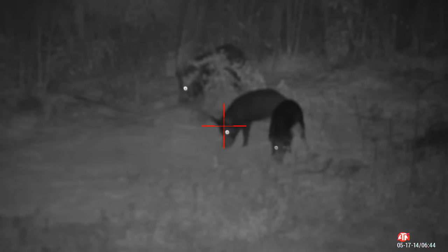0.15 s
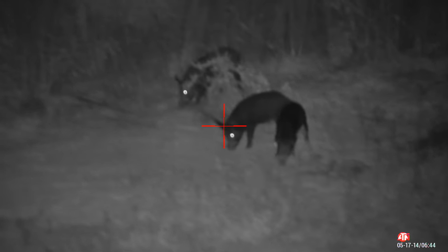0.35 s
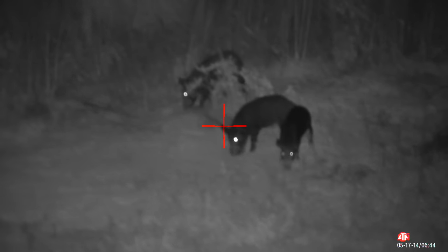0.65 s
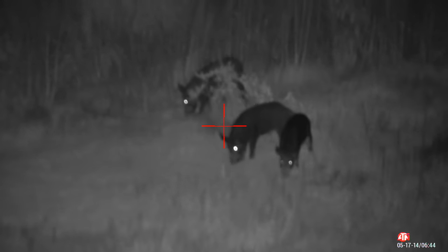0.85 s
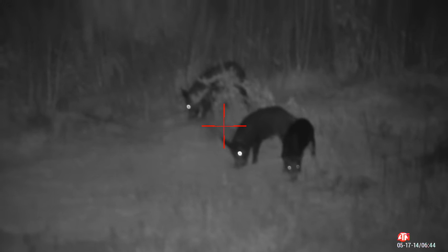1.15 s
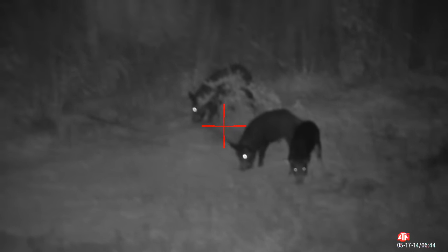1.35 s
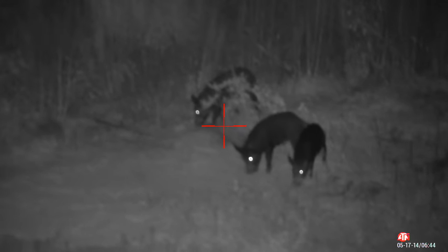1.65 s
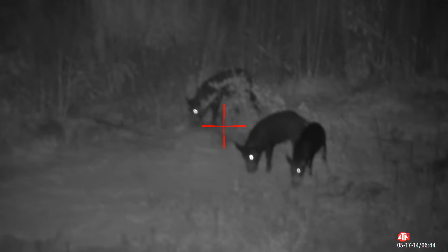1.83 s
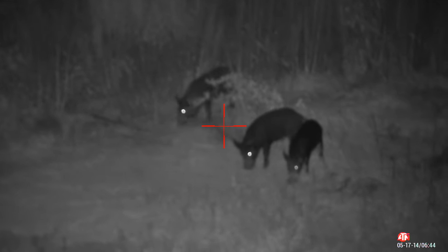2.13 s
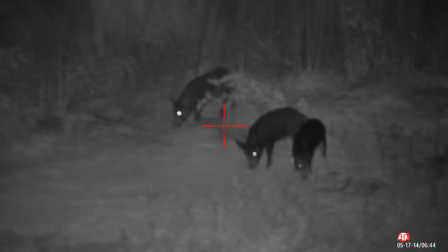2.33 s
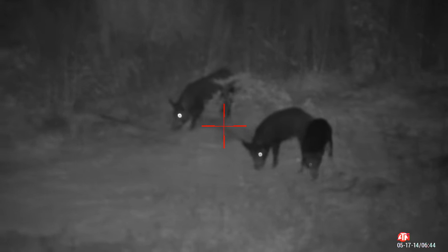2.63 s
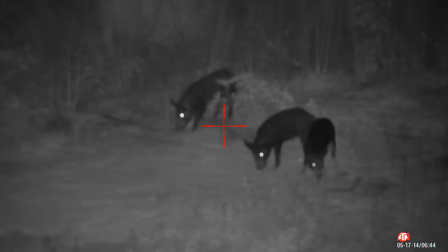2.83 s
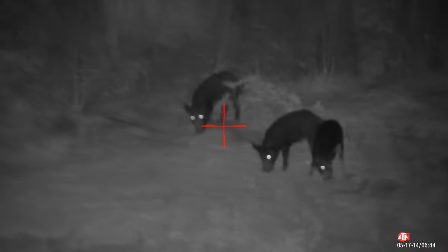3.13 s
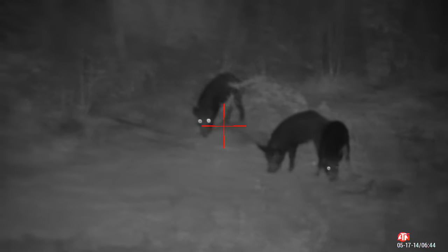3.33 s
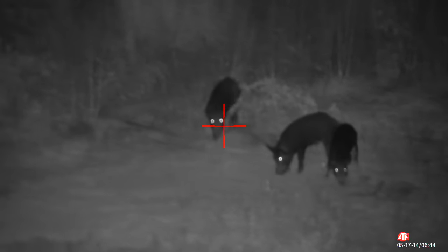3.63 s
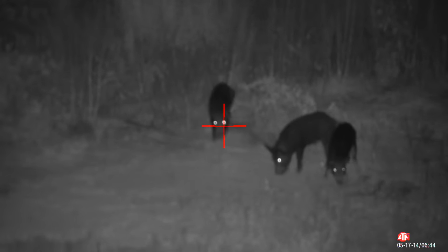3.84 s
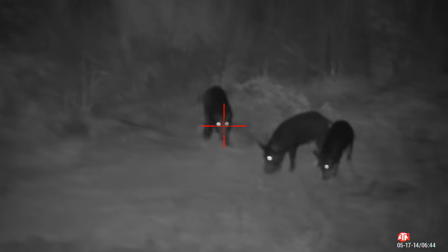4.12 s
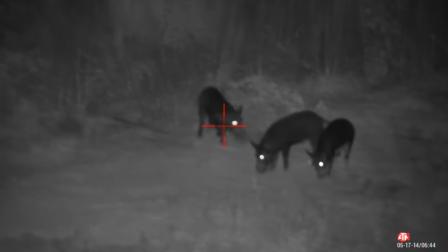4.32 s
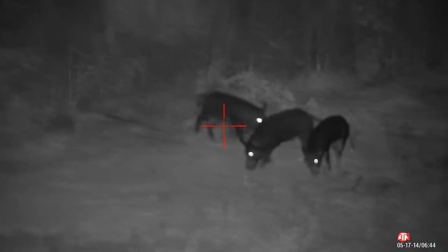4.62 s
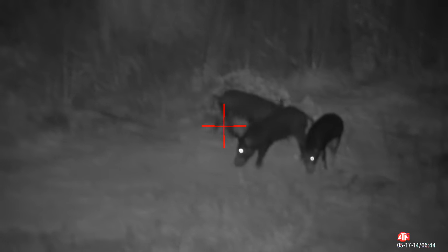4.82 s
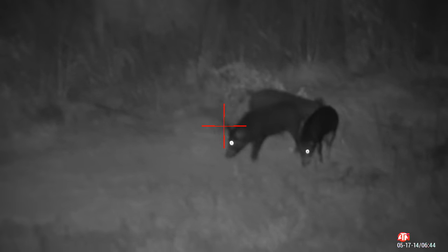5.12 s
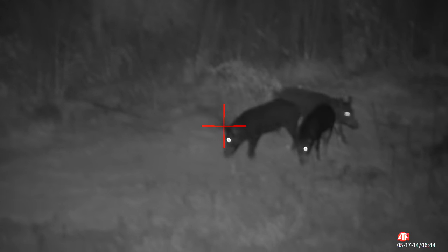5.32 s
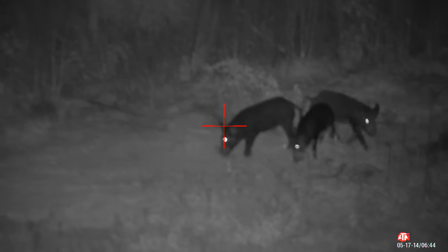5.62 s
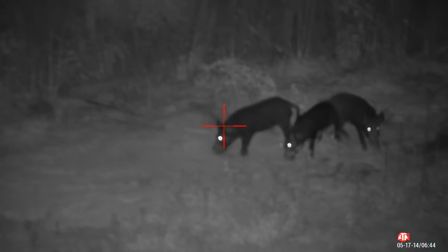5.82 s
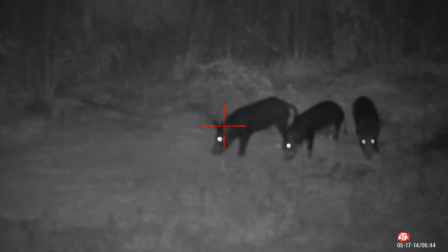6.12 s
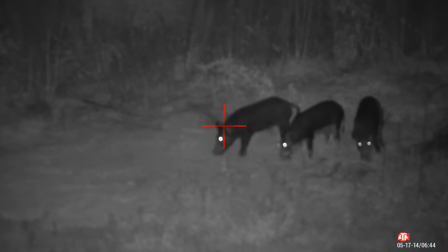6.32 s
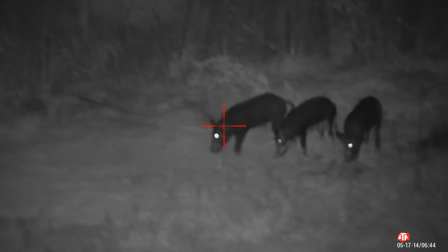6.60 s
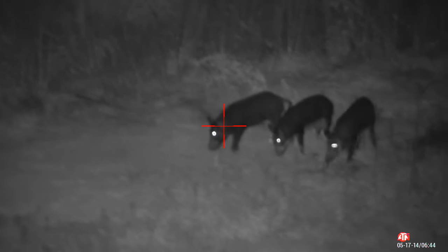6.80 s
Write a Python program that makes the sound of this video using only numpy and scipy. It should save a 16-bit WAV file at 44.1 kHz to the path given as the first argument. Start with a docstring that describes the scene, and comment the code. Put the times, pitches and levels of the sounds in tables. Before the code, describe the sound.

A dense, high-pitched cricket chorus fills a forest clearing at night for the whole seven seconds. Distant singers blur into a steady shrill wash, while nearer ones add fast trills, a quick rattle and chirps pulsing about three times a second. One unbroken trill leads, swelling briefly near 0.2, 2.1, 4.5 and 5.7 seconds. The rattling cricket rests from about 4.5 to 5.5 seconds, and a faint lower trill eases in and out.

Far off, wild pigs forage very quietly, with barely audible grass rustling and soft bumps. There is a faint knock near 1 second, and small twig snaps come at about 3.5, 4.1 and 5.4 seconds. Close to the single microphone, a faint low electronic buzz, a thin whine and a soft hiss continue underneath. The crickets dominate to the end.

```python
"""A forest clearing at night, heard through the single microphone of a night-vision scope.
Crickets sing all around, each wing stroke a short falling tone. The trees smear the far ones into
bands; a few nearer singers stand out, led by one unbroken trill. Far off, wild pigs forage with faint
snaps and bumps. Right at the microphone lie the scope's frame-rate buzz, a thin whine and hiss."""
import sys
import numpy as np
from scipy import signal
from scipy.fft import rfft, irfft, next_fast_len
from scipy.io import wavfile
from scipy.ndimage import uniform_filter1d

SR = 44100
rng = np.random.default_rng(int(sys.argv[2]) if len(sys.argv) > 2 else 0)


def digitize_waveform(pressure):
    """Quantize a signal to 16-bit integers and store it at the path in sys.argv[1].

    Rows of a 2-D input are taken as channels; values are limited to [-1, 1].
    """
    field = np.atleast_2d(pressure).T
    bounded = np.clip(field, -1, 1)
    quanta = np.round(bounded * 32767).astype(np.int16)
    wavfile.write(sys.argv[1], SR, quanta)


N = 306936


def undb(db):
    """Decibels to gain."""
    return 10 ** (np.asarray(db) / 20)


def level(x, db):
    """Scale a sound to an rms level."""
    return x * undb(db) / np.sqrt(np.mean(x ** 2))


def clock():
    """Time of every sample in seconds."""
    return np.arange(N) / SR


def walk(rate):
    """Slow chance: `rate` random values a second joined by lines, spread near 1."""
    steps = rng.standard_normal(1024)
    return np.interp(clock() * rate, np.arange(len(steps)), steps)


def beat(rate, crest_s, sharpness):
    """A smooth gain that crests `rate` times a second."""
    return np.exp(sharpness * (np.cos(2 * np.pi * rate * (clock() - crest_s)) - 1))


def bouts(rows, fade_s):
    """Gain that sets in, holds and dies away for each row of start t/s, end t/s, level/dB."""
    t = clock()
    held = sum(undb(db) * ((t >= start) & (t < end)) for start, end, db in rows)
    return uniform_filter1d(held, int(fade_s * SR))


def band_noise(hz, width_hz):
    """Noise passed twice through one resonance, rms 1."""
    resonance = signal.iirpeak(hz, hz / width_hz, fs=SR)
    once = signal.lfilter(*resonance, rng.standard_normal(N))
    return level(signal.lfilter(*resonance, once), 0)


# noise floor of the clearing and the microphone: f/Hz, level/dB per Hz
AIR_SPECTRUM = [(25, -131), (60, -116), (120, -105), (220, -99), (370, -90), (600, -91.5), (1000, -92.5),
                (1500, -96), (4000, -98), (7000, -102), (9300, -106), (12200, -105), (13400, -107),
                (15000, -104)]

def air():
    """A smooth bed of distant forest noise and microphone hiss."""
    hz, db = np.transpose(AIR_SPECTRUM)
    bins_hz = np.maximum(np.fft.rfftfreq(N, 1 / SR), 1)
    colour = undb(np.interp(np.log(bins_hz), np.log(hz), db))
    return irfft(rfft(rng.standard_normal(N)) * colour, N) * np.sqrt(SR / 2)


# partials of the scope's whine: multiple of the base, level/dB
WHINE_PARTIALS = [(4, -84), (5, -80), (7, -80), (8, -81), (10, -80), (12, -69.5), (24, -79)]

def scope_whine(base_hz=54.94):
    """The electronics at the microphone hold a thin, steady chord."""
    cycles = base_hz * clock()
    partials = (undb(db) * np.sin(2 * np.pi * (k * cycles + rng.random())) for k, db in WHINE_PARTIALS)
    return np.sqrt(2) * sum(partials)


# colour of the scope's frame pulses: f/Hz, level/dB per harmonic
BUZZ_SPECTRUM = [(60, -107), (120, -86), (150, -85), (180, -76.5), (210, -76.5), (270, -80.5), (300, -71.5),
                 (330, -70.5), (390, -72), (420, -87), (450, -73.5), (600, -84.5)]

def scope_buzz(frame_hz=29.97, offset_s=.008):
    """The electronics pulse once a picture frame, which makes a low buzz."""
    frame_phase = 2 * np.pi * frame_hz * (clock() - offset_s)
    hz, db = np.transpose(BUZZ_SPECTRUM)
    harmonics = np.arange(2, 21)
    gains = np.sqrt(2) * undb(np.interp(np.log(harmonics * frame_hz), np.log(hz), db))
    # neighbouring harmonics stay nearly in step, which spreads each click into a soft purr
    phases = np.cumsum(.7 * rng.standard_normal(len(harmonics)))
    return sum(gain * np.cos(k * frame_phase + phase) for k, gain, phase in zip(harmonics, gains, phases))


# spells of rooting in the grass: start t/s, end t/s, level/dB
ROOTING_SPELLS = [(.35, 1.5, -68), (3.65, 5.8, -68.5), (6.2, 6.96, -69)]
# twig snaps, soft bumps and one faint grunt: t/s, centre f/Hz, width/Hz, length/s, level/dB at the crest
FORAGING_SOUNDS = [(.58, 115, 70, .02, -71.5), (.965, 480, 200, .04, -59), (2.235, 120, 40, .02, -77),
                   (3.497, 1700, 800, .006, -56.5), (3.868, 110, 40, .02, -76),
                   (4.063, 2420, 900, .005, -49), (5.243, 110, 60, .02, -73),
                   (5.372, 2450, 800, .005, -49.5)]

def pigs():
    """Far from the microphone, foraging pigs snap twigs, bump about and grunt once over a faint rustle of
    grass."""
    out = band_noise(hz=890, width_hz=570) * bouts(ROOTING_SPELLS, fade_s=.22)
    for s, hz, width_hz, length_s, db in FORAGING_SOUNDS:
        envelope = np.exp(-2 * ((clock() - s) / length_s) ** 2)
        out += undb(db) * band_noise(hz, width_hz) * envelope
    return out


def woods(x, echo_db, t60_s=.45, drift_s=.00012, breeze_rate=3.5):
    """The direct sound plus a smear scattered by trunks and leaves; moving air keeps shifting its path."""
    t = np.arange(SR) / SR
    size = next_fast_len(N + SR)
    tail = rfft(rng.standard_normal(SR) * np.exp(-np.log(1000) * t / t60_s), size)
    primed = np.concatenate([x[-SR:], x])  # a second's lead-in, so the woods already ring
    # the many paths smear the sound in time and leave its colour alone
    echo = irfft(rfft(primed, size) * tail / np.abs(tail), size)
    read_at = SR + np.arange(N) + SR * drift_s * walk(breeze_rate)
    return x + undb(echo_db) * np.interp(read_at, np.arange(size), echo)


def strokes(hz, fall_hz, rate, unsteady=.006, duty=.62, jitter=.007):
    """A scraper runs along the wing's file: a tone that swells, falls as the wing slows, then rests."""
    tempo = rate * (1 + unsteady * walk(2))  # strokes per second
    cycles = rng.random() + np.cumsum(tempo) / SR
    stroke = cycles.astype(int)
    detune, stroke_db = rng.standard_normal((1024, 2))[stroke].T
    travel = np.minimum((cycles - stroke) / duty, 1)  # 0 to 1 along the file
    pitch_hz = hz * (1 + jitter * detune) + fall_hz * (.5 - travel)
    envelope = undb(stroke_db) * np.sin(np.pi * travel)
    return envelope * np.sin(2 * np.pi * np.cumsum(pitch_hz) / SR)


# crowds of crickets deep in the trees: f/Hz, pitch spread/Hz, strokes per s, level/dB
FAR_CROWDS = [(2086, 55, 52, -62.5), (2685, 110, 42, -66), (3477, 225, 43, -49.5), (4230, 100, 44, -73.5),
              (4679, 150, 48, -50), (4917, 125, 46, -42), (5537, 240, 48, -52.5), (6330, 250, 57, -68),
              (7870, 400, 55, -70.5)]

def far_crowd(hz, spread_hz, rate, db):
    """Nine far singers, mostly echo, each on its own pitch and tempo, fainter at the band's edges."""
    voices = 0
    for offset in np.linspace(-2.1, 2.1, 9):
        tempo = rate * (1 + .07 * rng.standard_normal())
        song = strokes(hz + offset * spread_hz, fall_hz=.055 * hz, rate=tempo, unsteady=.03, jitter=.012)
        voices += np.exp(-(offset / 2) ** 2) * song
    return level(woods(voices, echo_db=14), db)


def high_triller(start_s=.0076, stop_s=4.56, db=-74.5):
    """A thin, high trill, faint at the microphone, holds its level and then breaks off."""
    song = strokes(hz=8245, fall_hz=190, rate=56.5, unsteady=.004, duty=.55, jitter=.003)
    return level(woods(song, echo_db=-5), 0) * bouts([(start_s, stop_s, db)], fade_s=.04)


# the tree cricket's song: start t/s, end t/s, level/dB
TREE_CRICKET_BOUTS = [(0, 2.55, -65.5), (3.8, 5.1, -62), (5.2, 6.96, -61.5)]

def tree_cricket():
    """A low trill eases in and out among the trees."""
    song = strokes(hz=2136, fall_hz=90, rate=52.4, unsteady=.012)
    return level(woods(song, echo_db=-1), 0) * bouts(TREE_CRICKET_BOUTS, fade_s=.54)


# the rattling cricket's song, with one rest: start t/s, end t/s, level/dB
RATTLER_BOUTS = [(0, 4.5, -57), (5.45, 6.96, -56.5)]

def rattler():
    """One cricket groups its fast strokes into a quick rattle."""
    song = strokes(hz=5640, fall_hz=380, rate=90, jitter=.014)
    song *= beat(rate=12.41, crest_s=.079, sharpness=1.1)
    return level(woods(song, echo_db=-1), 0) * bouts(RATTLER_BOUTS, fade_s=.1)


def chirper():
    """Another groups its strokes into slow chirps."""
    song = strokes(hz=3480, fall_hz=450, rate=44.6, unsteady=.012, jitter=.025)
    song *= beat(rate=3.12, crest_s=.121, sharpness=.8)
    return level(woods(song, echo_db=0), -54)


# steady crickets nearer by: f/Hz, fall within a stroke/Hz, strokes per s, level/dB, echo/dB
NEAR_TRILLERS = [(2612, 130, 42.54, -63.8, -4), (2980, 80, 28.64, -64.5, 0), (2830, 80, 36.2, -72, 0),
                 (4560, 480, 44.12, -50.5, 0), (5216, 20, 45.9, -51.3, 2)]

def near_triller(hz, fall_hz, rate, db, echo_db):
    """A cricket close enough to the microphone for its stroke rate to be made out."""
    return level(woods(strokes(hz, fall_hz, rate, jitter=.006), echo_db), db)


# moments when the level of the trill near 4.9 kHz rises briefly: t/s, rise in level/dB
LEVEL_RISES = [(.18, 5.5), (1.5, 1.5), (2.12, 5), (3.07, 3), (4.48, 4), (5.71, 5.5)]

def lead_trill(db=-47, waver_db=.6, rise_s=.1):
    """An unbroken trill near 4.9 kHz; its level at the microphone wavers and at moments rises briefly."""
    song = strokes(hz=4920, fall_hz=520, rate=45.95, duty=.5, jitter=.014)
    rises_db = sum(rise_db * np.exp(-((clock() - s) / rise_s) ** 2) for s, rise_db in LEVEL_RISES)
    return level(woods(song, echo_db=-1), db) * undb(waver_db * walk(2.98) + rises_db)


def scene():
    """The whole clearing reaches one microphone, the same in both ears."""
    mono = air() + scope_whine() + scope_buzz() + pigs()
    mono += sum(far_crowd(*row) for row in FAR_CROWDS)
    mono += high_triller() + tree_cricket() + rattler() + chirper()
    mono += sum(near_triller(*row) for row in NEAR_TRILLERS) + lead_trill()
    return np.array([mono, mono])


def record(dry, top_hz=15300):
    """The recorder cuts the top steeply."""
    return signal.sosfilt(signal.ellip(12, .1, 80, top_hz, fs=SR, output="sos"), dry)


dry = scene()
out = record(dry)
digitize_waveform(out)
```